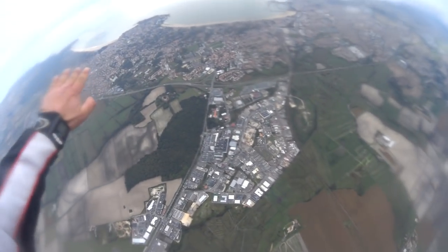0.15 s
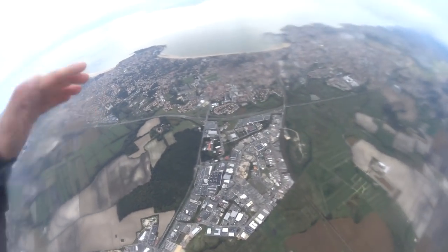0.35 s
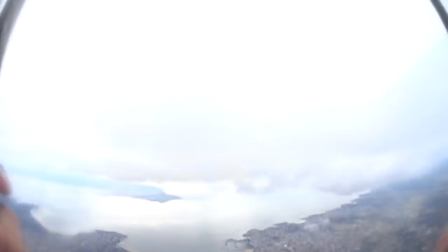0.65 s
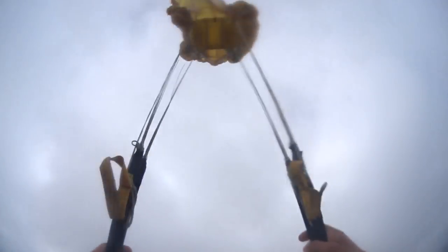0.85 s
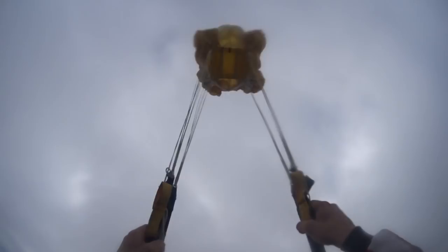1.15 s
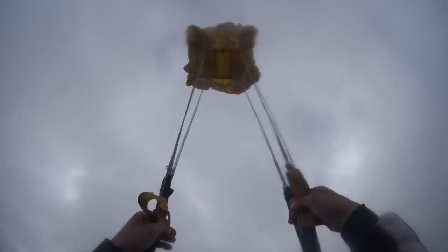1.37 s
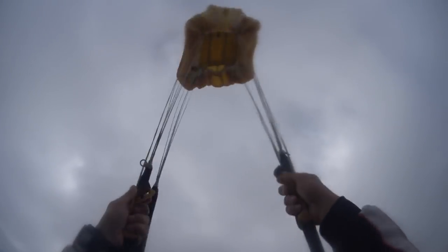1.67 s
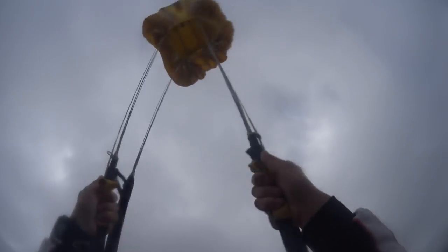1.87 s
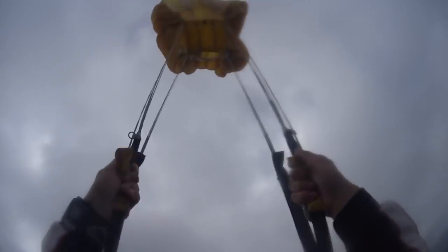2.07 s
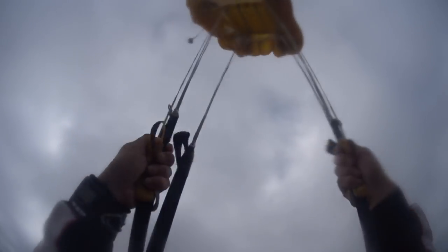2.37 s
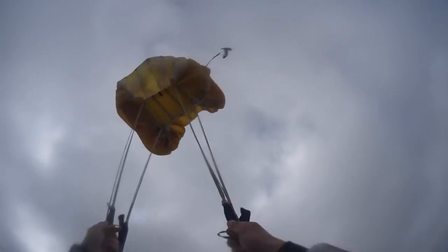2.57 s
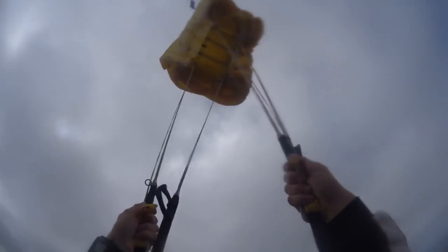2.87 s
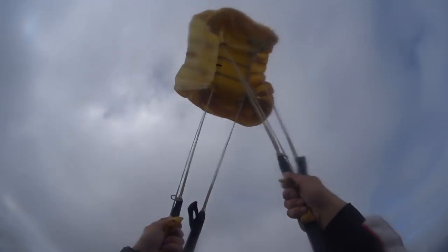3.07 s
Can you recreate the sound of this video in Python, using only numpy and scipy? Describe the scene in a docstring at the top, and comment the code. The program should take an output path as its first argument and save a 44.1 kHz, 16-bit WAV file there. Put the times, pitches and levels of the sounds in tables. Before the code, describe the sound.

Skydiving wind roars, then drops away as a parachute flaps and snaps open overhead.

```python
"""A skydive, in open air, from a helmet camera: two microphone ports in a plastic housing.
At first freefall air roars and spits right on the housing, with one knock on the helmet.
From 0.6 s the canopy opens overhead: its cloth flutters, flaps and snaps taut, and the roar drops away.
As the fall slows the rush weakens, leaving low buffeting and single flaps and snaps of cloth.
Near the end a harness fitting ticks close by."""
import sys
import numpy as np
from scipy import signal
from scipy.fft import rfft, irfft, next_fast_len
from scipy.io import wavfile

SR = 44100
rng = np.random.default_rng(int(sys.argv[2]) if len(sys.argv) > 2 else 0)


def generate_wav(sig):
    """Save sig (samples, or channels by samples) to the path in sys.argv[1] as 16-bit PCM at SR."""
    pcm = np.round(np.clip(np.atleast_2d(sig).T, -1, 1) * 32767).astype(np.int16)
    wavfile.write(sys.argv[1], SR, pcm)


N = 142002
TIME = np.arange(N) / SR
FFT_SIZE = 2 * next_fast_len(N // 2 + 4096)
HZ = np.maximum(np.fft.rfftfreq(FFT_SIZE, 1 / SR), 1)
CUTOFF_HZ = 11020


def from_db(db):
    """Decibels to gain."""
    return 10 ** (np.asarray(db) / 20)


def level(curve):
    """Gain over time from (t/s, level/dB) points."""
    return from_db(np.interp(TIME, *np.transpose(curve)))


def across_hz(rows):
    """Each column of a table spread over log frequency."""
    hz, *columns = np.transpose(rows)
    return [np.interp(np.log(HZ), np.log(hz), column) for column in columns]


def flicker(rate_hz, depth_db):
    """Random swelling and sinking of mean power 1."""
    band = HZ / (HZ + rate_hz / 2) / (1 + (HZ / rate_hz) ** 4)
    wander = irfft(rfft(rng.standard_normal(FFT_SIZE)) * band, FFT_SIZE)[:N]
    gain = from_db(depth_db * np.clip(wander / wander.std(), -2.5, 2.5))
    return gain / np.sqrt(np.mean(gain ** 2))


def port_noise():
    """Three white noises: shared, left port, right port."""
    return rng.standard_normal((3, N))


def bursts(rows, rise_s, fade_s):
    """Envelope of (t/s, length/s, level/dB) events that rise, hold and fade, added in power."""
    power = 0
    for start_s, length_s, db in rows:
        rise = np.clip((TIME - start_s) / rise_s + .5, 0, 1)
        fade = np.exp(-np.maximum(TIME - start_s - length_s, 0) / fade_s)
        power += (from_db(db) * rise * fade) ** 2
    return np.sqrt(power)


# the two microphone ports: (f/Hz, likeness/0-1, right lead/rad, left minus right/dB)
MIC_PORTS = [(80, .98, 0, -.4), (140, .88, 0, -.7), (260, .78, .05, -.3), (450, .84, .25, .3),
             (870, .57, 1.1, .7), (1170, .7, .7, 1.5), (1420, .52, 1.1, .5), (1900, .9, .1, -.3),
             (2700, .68, .15, 2), (3400, .55, .4, 1.5), (4200, .58, 2.4, 3), (5000, .35, 2.8, 3),
             (6000, .72, 3.3, 0), (7200, .5, 3.4, -2.5), (8500, .22, 3, -.5), (10800, .4, 2.8, .5)]

def at_ports(shared, left, right):
    """Three spectra to stereo: the ports hear partly the same air, apart in phase and level."""
    alike, lead, balance_db = across_hz(MIC_PORTS)
    common, own = np.sqrt(alike) * shared, np.sqrt(1 - alike)
    left = (common + own * left) * from_db(balance_db / 2)
    right = (common * np.exp(1j * lead) + own * right) * from_db(-balance_db / 2)
    return irfft(np.array([left, right]), FFT_SIZE)[:, :N]


# resonances of the housing around the microphone: (f/Hz, half width/Hz, lift/dB)
HOUSING_MODES = [(1188, 37, 2), (1912, 354, 7), (2745, 203, 5.5), (3944, 605, 5), (6970, 640, 2.5),
                 (10120, 1150, 4.5)]

def housed(drive, colour):
    """Colour a source, ring it through the housing (power kept) and pick it up at both ports."""
    lift_db = sum(db * np.exp(-((HZ - hz) / width) ** 2) for hz, width, db in HOUSING_MODES)
    gain = from_db(across_hz(colour)[0] + lift_db)
    gain /= np.sqrt(np.mean(gain ** 2 * (HZ < CUTOFF_HZ)))
    cepstrum = irfft(np.log(gain), FFT_SIZE)
    causal_phase = 2 * rfft(cepstrum[:FFT_SIZE // 2], FFT_SIZE).imag
    return at_ports(*rfft(drive, FFT_SIZE) * gain * np.exp(1j * causal_phase))


# knocks on the helmet, tick of a harness fitting: (t/s, length/s, level/dB)
HELMET_KNOCKS = [(.2255, 0.0036, -9.5), (2.887, .002, -32)]
HARNESS_TICKS = [(2.6558, .0025, -17)]
# their spectra: (f/Hz, relative level/dB)
KNOCK_COLOUR = [(400, -30), (1000, 3), (1450, 6.5), (2000, 3), (2600, -10), (4000, -3), (7000, -22)]
TICK_COLOUR = [(2000, -16), (3900, 1), (4400, -2), (5000, 12.5), (6200, 4), (7300, -5), (8600, 1),
               (11000, -4)]

def gear():
    """Dull knocks on the helmet that carries the microphone, and a bright tick of metal close by."""
    knocks = port_noise() * bursts(HELMET_KNOCKS, rise_s=.001, fade_s=.009)
    tick = port_noise() * bursts(HARNESS_TICKS, rise_s=.0005, fade_s=.0016)
    return housed(knocks, KNOCK_COLOUR) + housed(tick, TICK_COLOUR)


# rush and low buffeting under the canopy: (t/s, level/dB)
RUSH_LEVEL = [(.55, -60), (.72, -24.5), (.8, -26), (.89, -26.5), (.94, -21), (1.05, -23), (1.38, -21),
              (1.55, -26), (1.65, -31), (1.9, -27.5), (2.2, -30), (2.42, -35), (2.6, -27.5), (2.74, -31),
              (2.83, -39.5), (3.0, -37.5), (3.22, -32)]
BUFFET_LEVEL = [(0, -40), (.3, -40), (.65, -28.5), (.87, -30), (.96, -27), (1.2, -29.5), (1.38, -23),
                (1.55, -25.5), (1.64, -32.5), (1.72, -24.5), (1.98, -32), (2.28, -28.5), (2.42, -38),
                (2.55, -28.5), (2.7, -27.5), (2.81, -33), (2.87, -40.5), (3.0, -34), (3.22, -36)]
# deep bumps of air, heavy gusts on the housing: (t/s, length/s, level/dB)
AIR_BUMPS = [(.93, 0.014, -32), (1.51, 0.021, -24), (2.645, .025, -32)]
GUST_THUMPS = [(.042, 0.013, -19), (.142, 0.012, -23), (.72, 0.019, -16.5), (.874, 0.0053, -16),
               (.928, 0.027, -18.5), (1.17, 0.0083, -23), (1.517, 0.012, -24.5), (1.68, 0.034, -27.5),
               (1.88, 0.013, -25.5), (1.932, 0.0083, -24), (2.003, 0.0068, -20.5), (2.135, 0.011, -24),
               (2.335, 0.0036, -24), (2.622, 0.01, -28), (2.68, 0.0091, -21.5), (2.76, 0.012, -28),
               (2.962, .008, -33), (3.096, 0.015, -23)]
# their spectra: (f/Hz, relative level/dB)
RUSH_COLOUR = [(50, -25.5), (130, 8), (200, 10.5), (330, 7.5), (600, -3), (1000, -4), (1900, -1.5),
               (3000, -12), (5000, -13), (8000, -32), (11000, -24.5)]
BUFFET_COLOUR = [(20, -10), (42, -7.5), (70, 3), (110, 0), (190, -1.5), (320, -9.5), (500, -17), (900, -29),
                 (3000, -46)]
THUMP_COLOUR = [(30, -21), (80, -10), (170, 2.5), (320, 0.5), (500, -7.5), (1000, -18.5), (3000, -31.5)]

def slipstream():
    """Rough air rushes past the helmet, buffets the microphone and thumps the housing in gusts."""
    rise_s, fade_s = .0033, .0035
    rush = port_noise() * level(RUSH_LEVEL) * flicker(rate_hz=98, depth_db=2.5)
    buffet_gain = np.hypot(level(BUFFET_LEVEL), bursts(AIR_BUMPS, rise_s, fade_s))
    buffet = port_noise() * buffet_gain * flicker(rate_hz=40, depth_db=3)
    thumps = port_noise() * bursts(GUST_THUMPS, rise_s, fade_s)
    return housed(rush, RUSH_COLOUR) + housed(buffet, BUFFET_COLOUR) + housed(thumps, THUMP_COLOUR)


# freefall roar, hiss of fast air tearing at the housing: (t/s, level/dB)
ROAR_LEVEL = [(0, -18), (.14, -18.5), (.2, -19.5), (.25, -21.5), (.33, -20), (.5, -20), (.62, -21),
              (.72, -25.5), (.78, -42), (1.0, -64)]
HISS_LEVEL = [(0, -22.5), (.09, -20.5), (.125, -28.5), (.16, -17), (.2, -23), (.25, -17.5), (.32, -19.5),
              (.35, -23), (.43, -19.5), (.45, -29), (.56, -25.5), (.58, -38), (1.3, -45), (1.6, -43.5),
              (2.7, -41), (2.82, -46), (3.22, -41)]
# short spits of hiss: (t/s, length/s, level/dB)
HISS_SPITS = [(.426, 0.0066, -19.5), (.469, 0.0034, -20.5), (.524, 0.0014, -8), (.561, 0.0078, -19.5),
              (1.521, .003, -32), (2.335, 0.0034, -26.5), (2.697, 0.0036, -31), (2.76, .004, -30)]
# their spectra: (f/Hz, relative level/dB)
ROAR_COLOUR = [(40, -31), (80, 2.5), (150, 8), (280, 7), (480, 4.5), (700, 0.5), (1150, 2), (1650, 1),
               (2000, -5), (2800, -9.5), (4000, -21.5), (7000, -29), (11000, -43)]
HISS_COLOUR = [(1000, -17), (2500, -13), (4000, -10.5), (5000, 0.5), (6500, -3.5), (8500, -4), (11000, 0)]

def freefall():
    """Full-speed turbulence right at the microphone, with a sputtering hiss on top."""
    roar = port_noise() * level(ROAR_LEVEL) * flicker(rate_hz=120, depth_db=1)
    spits = bursts(HISS_SPITS, rise_s=.00085, fade_s=.00082)
    hiss = port_noise() * np.hypot(level(HISS_LEVEL) * flicker(rate_hz=200, depth_db=3.5), spits)
    return housed(roar, ROAR_COLOUR) + housed(hiss, HISS_COLOUR)


def creases(per_s=2200, spread_db=4, bed_db=-2):
    """Creases flick over as dense uneven clicks on a bed of cloth noise; rms 1."""
    sizes = from_db(spread_db * np.minimum(rng.exponential(1, N), 3))
    clicks = sizes * (rng.random(N) < per_s / SR) * rng.choice([-1, 1], (3, N))
    cloth = clicks / clicks.std() + from_db(bed_db) * port_noise()
    return cloth / cloth.std()


# running flutter of the cloth overhead: (t/s, level/dB)
FLUTTER_LEVEL = [(.55, -31), (.7, -27), (.83, -24), (.86, -31.5), (.905, -36), (.93, -22.5), (1.0, -21),
                 (1.08, -17.5), (1.2, -23), (1.33, -23), (1.39, -22), (1.43, -31.5), (1.65, -34),
                 (1.85, -33), (1.98, -40), (2.18, -33), (2.42, -40), (2.6, -35), (2.83, -42.5),
                 (3.22, -39.5)]
# single flaps: (t/s, length/s, level/dB)
CLOTH_FLAPS = [(.708, 0.051, -23.5), (.77, 0.0075, -17.5), (.8, 0.0073, -15), (.829, 0.012, -24.5),
               (.874, 0.0022, -25), (.957, 0.0047, -13), (1.011, 0.011, -18.5), (1.093, 0.018, -21.5),
               (1.238, 0.021, -20), (1.305, 0.011, -17), (1.466, 0.018, -22), (1.494, 0.018, -23.5),
               (1.527, 0.0055, -24), (1.572, 0.015, -27.5), (1.718, 0.0037, -21), (1.872, 0.025, -26),
               (1.922, 0.018, -27), (2.005, 0.014, -30.5), (2.062, 0.034, -23), (2.125, 0.034, -28),
               (2.277, 0.012, -25), (2.336, 0.0078, -27.5), (2.502, 0.0061, -25.5), (2.52, 0.012, -26),
               (2.553, 0.026, -21.5), (2.611, 0.0073, -26.5), (2.69, 0.0096, -26.5), (2.713, 0.013, -31.5),
               (2.906, 0.0064, -28.5), (2.926, .009, -28.5), (3.03, 0.035, -34), (3.058, 0.0075, -26.5),
               (3.097, 0.0086, -25.5), (3.161, 0.013, -30)]
# their spectra: (f/Hz, relative level/dB)
FLUTTER_COLOUR = [(150, -9.5), (600, 2), (1200, -4), (1900, -2), (2600, -2.5), (4000, -0.5), (6500, -4),
                  (8000, -15), (11000, -14.5)]
FLAP_COLOUR = [(120, -14), (300, 4), (700, 1), (1200, -3.5), (1600, 1.5), (2600, -4), (3700, -1),
               (4600, -7.5), (6000, -7.5), (8000, -17), (11000, -13.5)]

def canopy():
    """Cloth above the microphone creases in a running flutter and single, fuller flaps."""
    flutter = creases() * level(FLUTTER_LEVEL) * flicker(rate_hz=117, depth_db=2)
    flap_gain = bursts(CLOTH_FLAPS, rise_s=.0011, fade_s=.0029)
    flaps = creases() * flap_gain * flicker(rate_hz=330, depth_db=1)
    return housed(flutter, FLUTTER_COLOUR) + housed(flaps, FLAP_COLOUR)


# housing resonances rung by flicks of cloth: (f/Hz, nominal level/dB re the flutter, ring time/s)
FLICK_MODES = [(1953, 2, 0.0032), (3710, 3, 0.0015)]

def flicks(per_mode_per_s=90, spread_db=3):
    """Random flicks within the flutter, each ringing one resonance of the housing."""
    rings, age = np.zeros(N), TIME[:1024]
    for hz, level_db, fade_s in FLICK_MODES:
        onsets = rng.random(N) < per_mode_per_s / SR
        sizes = from_db(level_db + spread_db * rng.uniform(-2.5, 1, N)) * level(FLUTTER_LEVEL)
        hits = onsets * sizes * rng.choice([-1, 1], N)
        ring = np.sin(2 * np.pi * hz * age) * np.exp(-age / fade_s)
        rings += signal.fftconvolve(hits, ring)[:N]
    return rings


def snap_pop(age, edge_hz, rise_s=.00057, fade_s=.0014):
    """The crack of one snap (shared, left, right): a noise pop of equal energy at any brightness."""
    noise = rng.standard_normal((3, len(age)))
    pop = noise * np.minimum(age / rise_s, 1) * np.exp(-age / fade_s)
    pop = signal.sosfilt(signal.butter(3, edge_hz, fs=SR, output="sos"), pop)
    return pop / np.sqrt(np.sum(pop ** 2, axis=1, keepdims=True) / (fade_s * SR))


def snap_ring(age, hz, rise_s=.00054, fade_s=.0018):
    """The few cycles of ring within one snap."""
    return np.sin(2 * np.pi * hz * age) * (1 - np.exp(-age / rise_s)) * np.exp(-age / fade_s)


# the canopy cracks taut: (t/s, relative level/dB, upper edge f/Hz, ring f/Hz)
CANOPY_SNAPS = [(.723, -10.5, 8000, 2400), (0.734, -7.5, 9000, 2660), (0.778, -10.5, 8000, 2880),
                (0.8083, -11, 3000, 2020), (.815, -6, 4530, 2520), (0.8364, -11.5, 5000, 2650),
                (0.85, -14, 7500, 2530), (0.877, -8, 3560, 1880), (0.9095, -9.5, 6500, 2220),
                (0.916, -6, 4500, 2100), (0.94, -8, 9000, 3770), (.9762, -14, 9000, 3830),
                (1.06, -8.5, 10000, 2600), (1.072, -13, 3500, 2190), (1.1242, -13, 4500, 3600),
                (1.163, -12, 7460, 3800), (1.231, -8, 9000, 1990), (1.291, -6, 6540, 2870),
                (1.321, -4.5, 7500, 2000), (1.357, -14, 7000, 1800), (1.386, -9.5, 7400, 1950),
                (1.4438, -11, 8000, 3620), (1.6939, -11.5, 3800, 1870), (1.888, -9, 4500, 1830),
                (2.144, -13.5, 4500, 3670), (2.5055, -26, 3500, 1890), (2.53, -13, 4170, 3030),
                (2.715, -18, 3500, 1930), (2.778, -11, 5200, 4070), (2.9043, -10, 3500, 2450),
                (2.917, -15, 6200, 4200), (3.062, -19.5, 3800, 1880)]
# spectrum of the pops: (f/Hz, relative level/dB)
SNAP_COLOUR = [(200, -7.5), (1000, -13.5), (2000, -0.5), (2700, 0), (4000, -2), (5500, 3), (8000, -2.5),
               (11000, -8)]

def snaps(length_s=.015, pop_db=-8, ring_db=-2):
    """Cloth pulled taut overhead: each snap is a pop through the housing and a ring in the centre."""
    pops, rings = np.zeros((3, N)), np.zeros(N)
    age = TIME[:int(length_s * SR)]
    for start_s, level_db, edge_hz, ring_hz in CANOPY_SNAPS:
        start = int(start_s * SR)
        span = slice(start, start + len(age))
        pops[:, span] += from_db(level_db + pop_db) * snap_pop(age, edge_hz)
        rings[span] += from_db(level_db + ring_db) * snap_ring(age, ring_hz)
    return housed(pops, SNAP_COLOUR) + rings


def scene():
    """Air and gear close to the helmet microphone, the canopy above it."""
    return freefall() + slipstream() + canopy() + flicks() + snaps() + gear()


def record(dry, overload=.6):
    """The camera flattens peaks towards the overload level (full scale 1) and cuts the top treble."""
    flattened = dry / (1 + (dry / overload) ** 4) ** .25
    return signal.sosfilt(signal.cheby1(16, .3, CUTOFF_HZ, fs=SR, output="sos"), flattened)


dry = scene()
out = record(dry)
generate_wav(out)
```